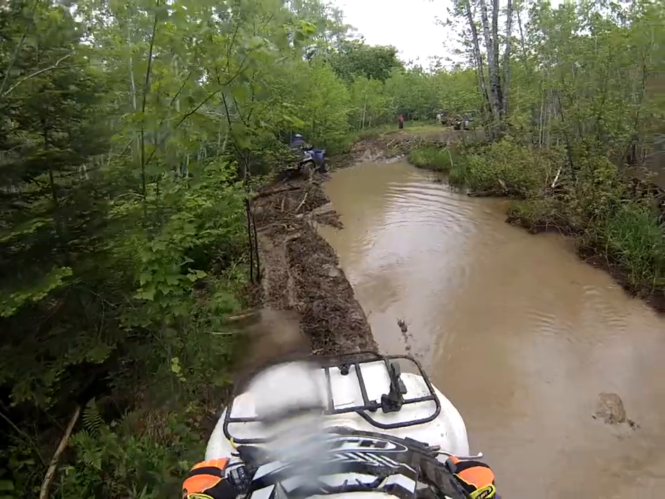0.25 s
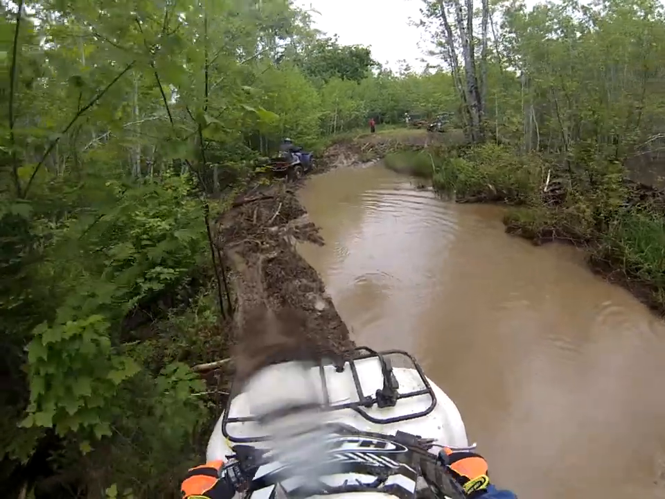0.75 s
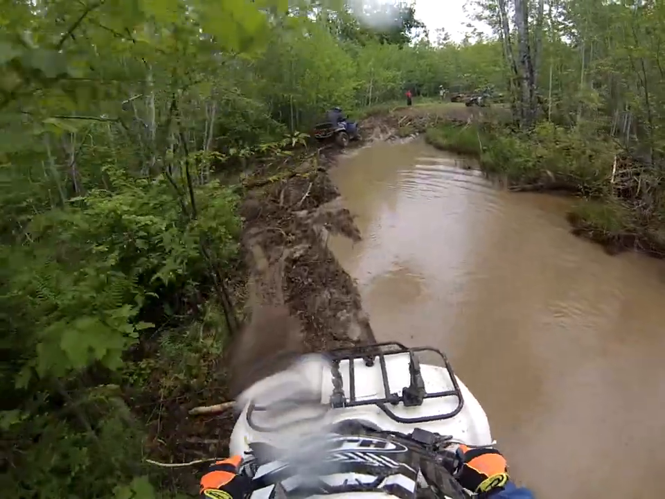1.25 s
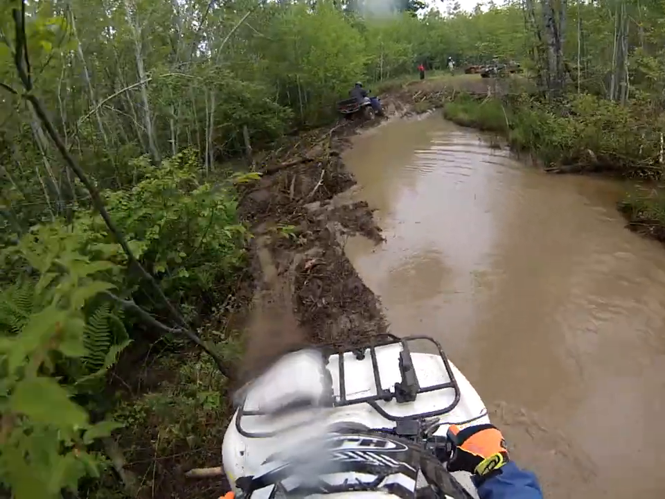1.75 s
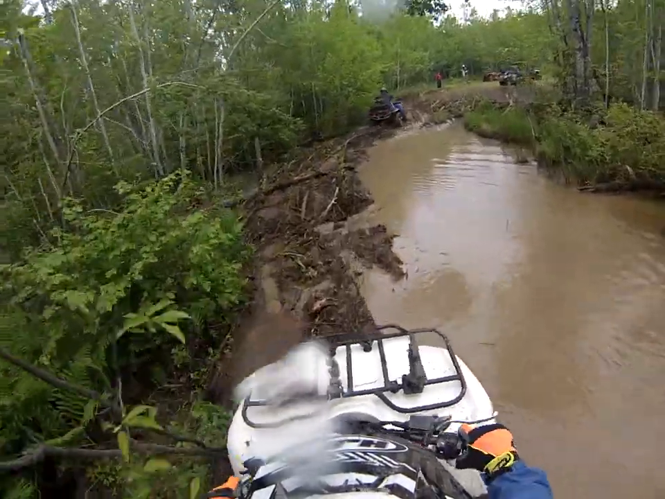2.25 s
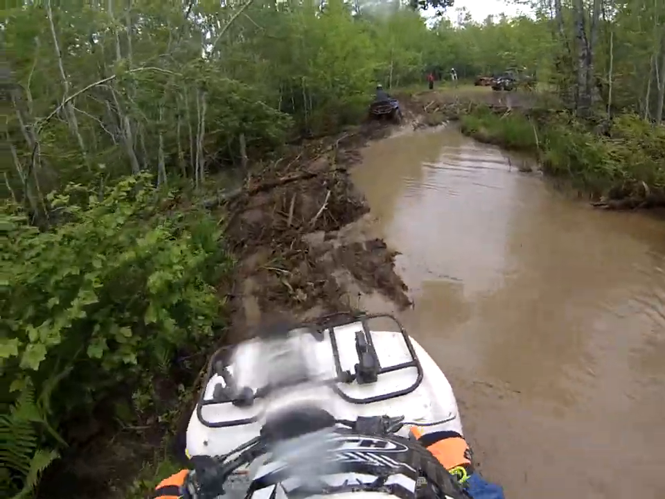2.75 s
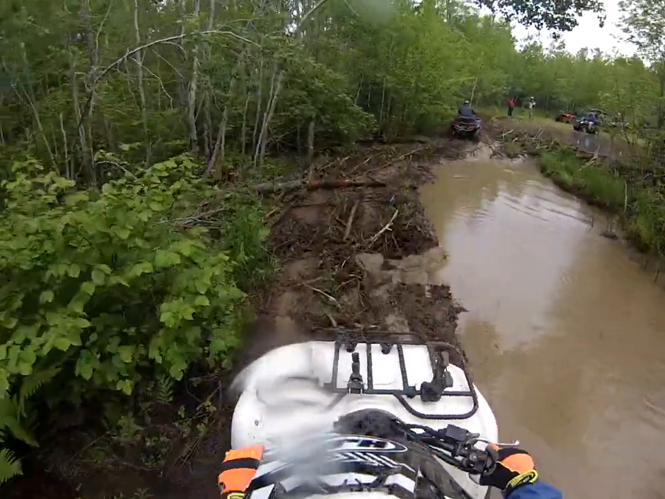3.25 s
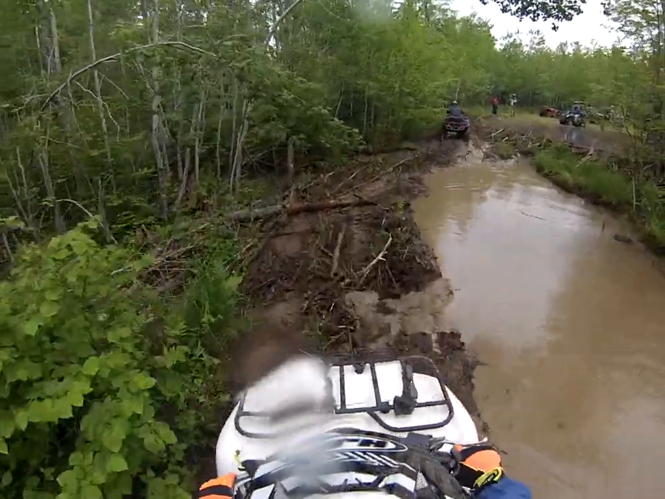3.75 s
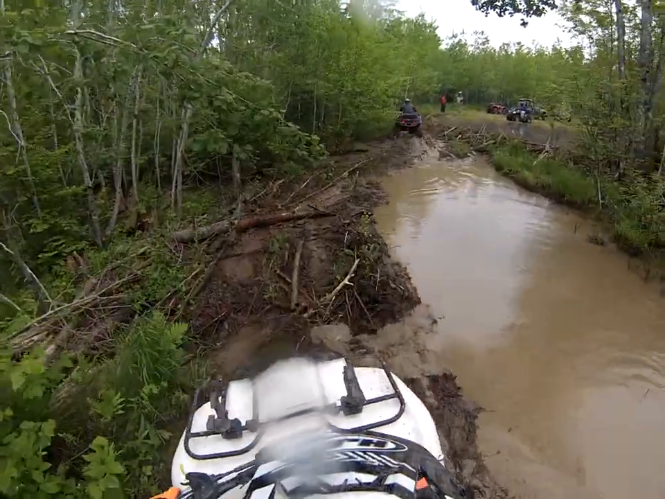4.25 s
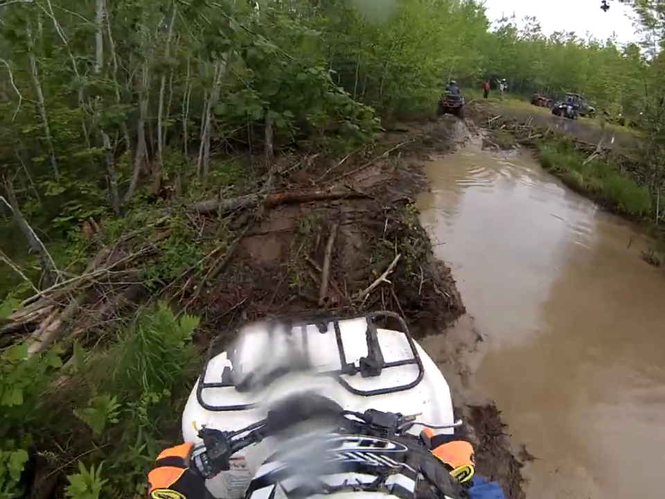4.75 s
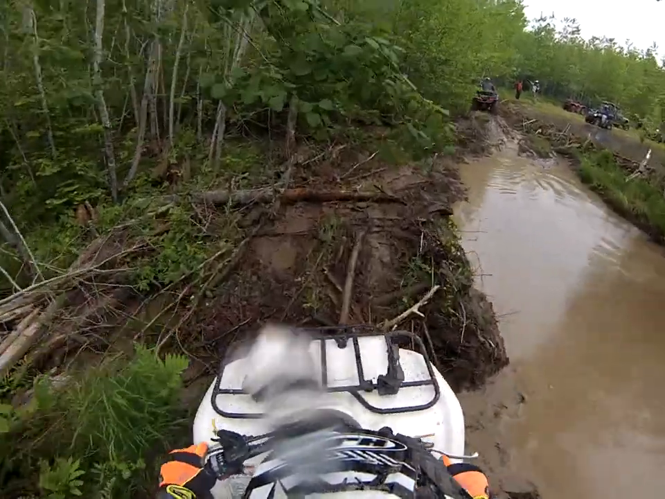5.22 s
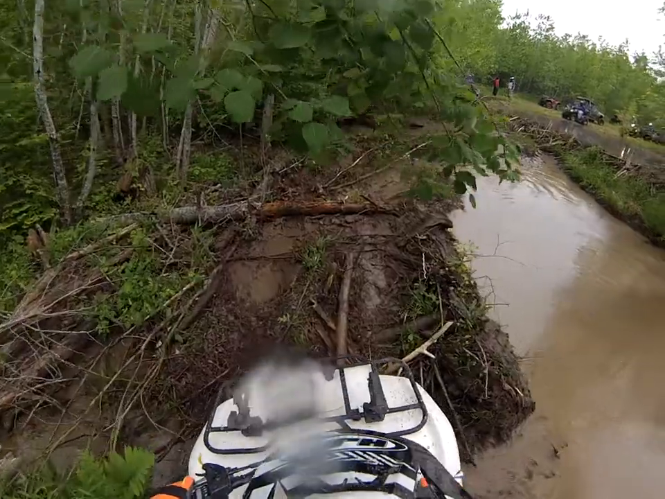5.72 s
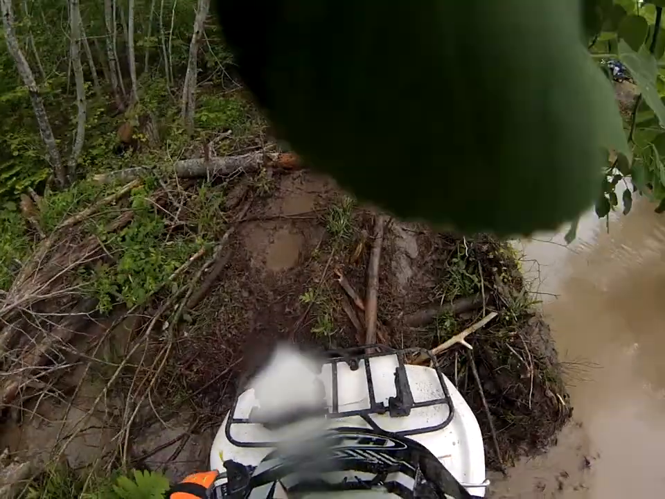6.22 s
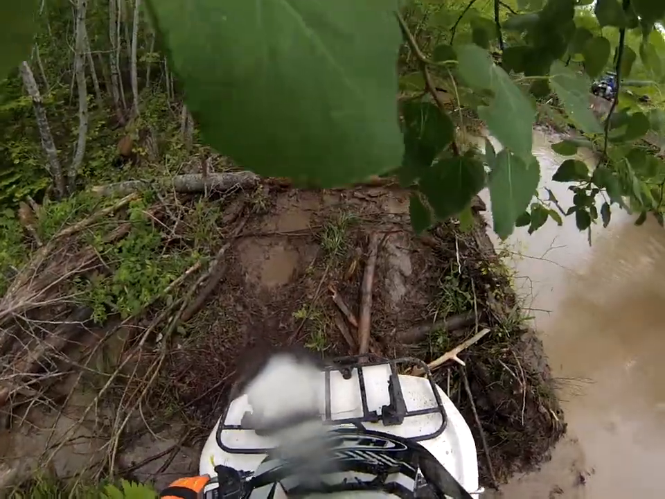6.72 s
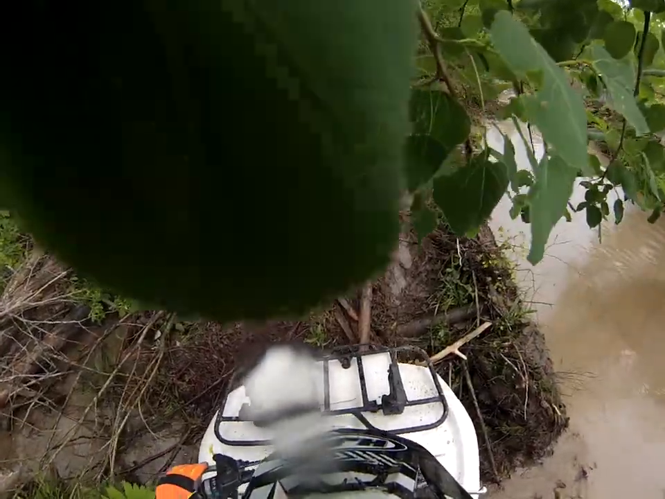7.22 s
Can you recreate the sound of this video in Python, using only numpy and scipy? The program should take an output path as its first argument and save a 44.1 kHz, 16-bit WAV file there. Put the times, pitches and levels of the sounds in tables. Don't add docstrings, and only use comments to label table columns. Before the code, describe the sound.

Heard from inside a closed helmet-camera housing, a one-cylinder quad bike chugs slowly over a muddy woodland trail. Its thump slows early, sags unevenly, then revs up late with buzzing panels. Valves and chain clatter dully while another engine drones further off. Deep jolts shake the microphone; a loud hard knock lands past the middle, then twigs tap and a leaf scrapes briefly.

```python
import sys
import numpy as np
from scipy import signal
from scipy.io import wavfile
from scipy.ndimage import uniform_filter1d

SR = 44100
rng = np.random.default_rng(int(sys.argv[2]) if len(sys.argv) > 2 else 0)


def materialize(psi):
    bounded = np.clip(np.atleast_2d(psi).T, -1, 1)
    quanta = np.round(bounded * 32767).astype(np.int16)
    wavfile.write(sys.argv[1], SR, quanta)


def linear_from_db(decibels):
    return 10 ** (np.asarray(decibels, float) / 20)


N = 329868
T = np.arange(N) / SR

# t/s, firing rate f/Hz
SPEED = [(0, 24.9), (.68, 22.9), (1.25, 16.1), (1.55, 15.3), (1.85, 17.8), (2.75, 16.51), (2.94, 16.85),
         (3.14, 16.13), (3.85, 16.49), (4.6, 12.75), (5.02, 15.24), (5.4, 11.87), (5.69, 17.05),
         (6.18, 15.6), (6.66, 22.95), (7.07, 22.6), (7.3, 27.5), (7.48, 25.6)]
# t/s, exhaust level/dB, frame load [0-1]
EFFORT = [(0, -47, 0.24), (.75, -44.5, 0.48), (1.5, -47, 0.03), (1.85, -44.5, 0.39), (2.9, -43, 0.28),
          (3.6, -46.5, 0.11), (4.4, -47.5, 0.15), (5.05, -46.5, 0.34), (5.3, -46.5, 0.16),
          (5.75, -47, 0.12), (6.18, -49.5, 0), (6.36, -47, 0.65), (6.65, -45.5, 0.89), (7.0, -49.5, 0.96),
          (7.15, -46.5, 1.02), (7.36, -50.5, .95), (7.44, -51, 0.3), (7.48, -62, .2)]
# multiple of firing rate, level/dB
EXHAUST_ORDERS = [(3, -10), (4, 0), (5, -1), (6, -7.5), (7, -13.5), (8, -16), (9, -23), (10, -36)]
# f/Hz, level/dB
PIPE = [(40, -13), (65, -3.5), (90, 0.5), (120, -3.5), (155, -4), (260, 3.5)]
# f/Hz, width/Hz, level/dB
PANELS = [(235, 22, -3), (271.3, 19, 2.5)]
# f/Hz, level/dB per Hz
CLATTER = [(35, 11), (70, 12), (130, 7), (200, 3.5), (300, 0), (500, -1.5), (900, -4), (2000, -8),
           (2900, -10.5), (5000, -15), (8000, -19.5), (12000, -32.5), (15500, -38)]
# f/Hz, width/Hz, level/dB
HOUSING = [(695, 12, 3.5), (1290, 101, 11.5), (1605, 38.6, 9.5), (2336, 280, 11), (4930, 59, -1),
           (7500, 940, 1)]
# t/s, firing rate f/Hz
FAR_SPEED = [(0, 29.8), (1.04, 29.3), (2, 28.8), (2.4, 29.4), (3.04, 26.8), (3.42, 27.8), (3.92, 28),
             (4.42, 29.7), (4.7, 30.2), (5.8, 30), (6.23, 28.8), (7.48, 28)]
# multiple of firing rate, level/dB
FAR_ORDERS = [(2, -17), (3, -5), (4, 1.5), (5, -3), (7, -7.5), (8, -9), (9, -8), (10, 0), (11, -4)]
# f/Hz, level/dB per Hz
HISS = [(1000, -41), (4000, -11), (8000, -16.5), (12000, -6.5), (15500, -12)]
# t/s, level/dB, length/s
JOLTS = [(0.144, -36, 0.029), (0.302, -40, 0.032), (0.78, -39, 0.11), (1.006, -25, 0.036),
         (1.71, -37.5, 0.21), (2.023, -33, 0.053), (2.246, -34, 0.073), (2.618, -35, 0.089),
         (3.03, -45, 0.07), (3.702, -42, 0.058), (3.9, -40.5, 0.095), (4.104, -31, 0.024),
         (4.296, -36.5, 0.096), (4.564, -38, .12), (4.934, -24.5, 0.036), (5.06, -37, 0.046),
         (5.254, -30, 0.055), (5.55, -33, 0.048), (5.752, -19, 0.037), (6.155, -34.5, 0.24),
         (6.38, -29, 0.086), (6.69, -32.5, 0.084), (6.884, -30, 0.032), (7.342, -26.5, 0.058),
         (7.48, -27, 0.037)]
# f/Hz, level/dB per Hz
SHAKE = [(2, -20), (4, -6), (9, -1), (14, 0), (19, -2), (23, -5), (28, -15), (40, -23), (80, -38),
         (200, -60), (600, -95)]
# t/s, ring peak level/dB, thud peak level/dB, struck spot f/Hz, tilt/dB per octave
RAPS = [
    (2.508, -39.5, -50, 2280, -6),
    (2.538, -43, -48, 2330, 6),
    (4.23, -40, -61, 1600, 2.1),
    (4.5375, -3, -15.5, 2040, 0.2),
    (5.2767, -33.5, -23, 1660, -14),
    (5.792, -42, -43, 2000, 8),
    (6.171, -21.5, -31, 2307, 6.5),
    (6.1754, -17, -22.5, 2050, -5.5),
    (6.28, -32.5, -50, 1900, 8),
    (7.229, -38.5, -42, 1630, 11),
]
# f/Hz, level/dB, t60/s
WALL_MODES = [(683, -26, 0.031), (788, -18.5, 0.026), (1000, -13.5, 0.016), (1224, -22.5, 0.028),
              (1615, -2.5, 0.015), (2302, 4, 0.014), (3090, -29, 0.022), (3340, -26, 0.01),
              (3660, -30, 0.03), (3990, -25, 0.02), (4960, -29, 0.0071), (5850, -26.5, 0.007),
              (7210, -32, 0.0067)]
# f/Hz, level/dB, t60/s
HELMET_MODES = [(81, 2.5, 0.056), (128, -2, 0.18), (194, -17, 0.31), (266.6, 3.5, 0.092)]
# f/Hz, level/dB
SCRAPE = [(200, -10), (800, 8), (2500, -1), (6000, 6), (9000, 0), (12000, 6)]

FLYWHEEL_S, START_TURNS = 0.08, 0.427
UNEVEN_DB, LUMPY = -0.75, 0.07
CRANK_DB, CRANK_LOAD_DB = -53, 10.5
BUZZ_DB, BUZZ_LOAD_DB = -76, 32.5
LOOSE_DB, LOOSE_LOAD_DB = -62.5, 6
DRIVE_ORDER, DRIVE_DB = 9, 4.5
CLATTER_DB, CLATTER_LOAD_DB = -54.5, 3
CLATTER_DB_PER_S = -0.2753
FAR_DB, FAR_HIGH_DB, FAR_WAVER_DB = -56, -10, 2.0
FAR_PULL_DB = 1.4
HISS_DB, TREMBLE_DB = -74, -40.5
CHIRP_S, CHIRP_LENGTH_S, CHIRP_DB, CHIRP_HZ = 1.35, 0.44, -77, 8400
TICK_DB, SPOT_DB, SPOT_SLOPE = -24, -10, -0.45
WHINE_START_S, WHINE_DB, WHINE_HZ = 2.9, -78, 5000
LEAF_ON_S, LEAF_OFF_S, LEAF_RISE_S, LEAF_FALL_S, LEAF_DB = 7.1, 7.32, 0.04, 0.026, -55
THIN_HZ, THIN_SHARE, STARVE_DB = 12800, 0.4, -27.5


def evened(x):
    return x / np.sqrt(np.mean(x ** 2) + 1e-20)


def levelled(x, size):
    return x / np.sqrt(uniform_filter1d(x ** 2, size))


def read(points, hz):
    f, value = np.transpose(points)
    return np.interp(np.log(hz + 1), np.log(f + 1), value)


def curves(rows):
    s, *columns = np.transpose(rows)
    return [np.interp(T, s, c) for c in columns]


def colour(x, db_of, size):
    log_gain = np.log(linear_from_db(db_of(abs(np.fft.fftfreq(size, 1 / SR)))))
    taps = np.fft.ifft(np.exp(np.conj(signal.hilbert(log_gain)))).real
    return signal.oaconvolve(x, taps[:size // 2])[:N]


def drift(seconds):
    size = round(seconds * SR)
    return evened(uniform_filter1d(uniform_filter1d(rng.standard_normal(N), size), size))


def resonate(x, hz, width):
    return signal.lfilter(*signal.iirpeak(hz, hz / width, SR), x)


def firing():
    hz = uniform_filter1d(curves(SPEED)[0], round(FLYWHEEL_S * SR))
    turns = START_TURNS + np.cumsum(hz) / SR + 0.004 * drift(0.06)
    cycle = np.floor(turns + 0.5).astype(int)
    strength = linear_from_db(UNEVEN_DB * rng.standard_normal((400, 2)))[cycle]
    return hz, turns, uniform_filter1d(strength, 600, axis=0).T


def exhaust(hz, turns, strength, level_db):
    orders = np.zeros(N)
    for k, db in EXHAUST_ORDERS:
        orders += linear_from_db(db + read(PIPE, k * hz)) * np.sin(2 * np.pi * k * turns)
    return linear_from_db(level_db + 3.0) * (strength + LUMPY * drift(0.0092)) * levelled(orders, 12000)


def crank(turns, load):
    shake = np.sin(4 * np.pi * turns) + 0.81 * np.sin(2 * np.pi * turns)
    return -np.sqrt(2) * linear_from_db(CRANK_DB + CRANK_LOAD_DB * load) * shake


def panel_gain(hz):
    power = sum(linear_from_db(2 * db) / (1 + (2 * (hz - f) / width) ** 2) ** 1.38 for f, width, db in PANELS)
    return np.sqrt(power)


def panel_buzz(hz, turns, strength, load):
    picked = np.zeros(N)
    for k in range(7, 24):
        gain = linear_from_db(DRIVE_DB * (k == DRIVE_ORDER)) * panel_gain(k * hz) ** 1.15
        picked += gain * np.cos(2 * np.pi * (k * turns - 0.08 * k ** 2))
    return linear_from_db(BUZZ_DB + BUZZ_LOAD_DB * load) * strength * levelled(picked, 12000)


def loose_parts(load):
    rattle = colour(rng.standard_normal(N), lambda f: 20 * np.log10(panel_gain(f)), size=16384)
    return linear_from_db(LOOSE_DB + LOOSE_LOAD_DB * load) * evened(rattle)


def housing_db(hz):
    peaks = sum(db / (1 + ((hz - f) / width) ** 2) for f, width, db in HOUSING)
    return read(CLATTER, hz) + peaks


def clatter(turns, strength, load):
    beat = 0.048 * strength * np.cos(2 * np.pi * (turns + 0.21))
    swell = 1 + 0.033 * drift(0.011) + beat + 0.1 * drift(0.01)
    noise = colour(swell * rng.standard_normal(N), housing_db, size=16384)
    noise /= np.sqrt(np.mean(resonate(noise, 1380, 2500) ** 2))
    return linear_from_db(CLATTER_DB + CLATTER_LOAD_DB * load + CLATTER_DB_PER_S * T) * noise


def far_engine():
    hz, = curves(FAR_SPEED)
    turns = np.cumsum(hz) / SR + 0.005 * drift(0.05)
    pull_db = FAR_HIGH_DB + FAR_PULL_DB * uniform_filter1d(np.gradient(hz) * SR, SR // 2)
    out = np.zeros(N)
    for k, db in FAR_ORDERS:
        level_db = db + FAR_DB + pull_db * (k >= 6) + FAR_WAVER_DB * drift(0.18)
        out += linear_from_db(level_db) * np.sin(2 * np.pi * (k * turns + rng.random()))
    return np.sqrt(2) * out


def hiss():
    return linear_from_db(HISS_DB) * evened(colour(rng.standard_normal(N), lambda f: read(HISS, f), size=1024))


def jolts():
    level = linear_from_db(TREMBLE_DB) + sum(linear_from_db(db) * np.exp(-((T - s) / length) ** 2) for s, db, length in JOLTS)
    lumps = colour(rng.standard_normal(N), lambda f: read(SHAKE, f), size=65536)
    size = np.sqrt(uniform_filter1d(lumps ** 2, 9000))
    lumps = evened(lumps / size ** 0.89)
    return signal.lfilter(*signal.butter(3, 34, fs=SR), level * lumps)


def belt_chirps(turns):
    squeal = resonate(resonate(rng.standard_normal(N), CHIRP_HZ, 900), CHIRP_HZ, 900)
    chirps = evened(squeal * np.exp(-(2 * turns % 1) / 0.2))
    return linear_from_db(CHIRP_DB) * np.exp(-((T - CHIRP_S) / CHIRP_LENGTH_S) ** 2) * chirps


def rung(modes, t, rise_s, lag_s, sense):
    ringing = np.zeros(len(t))
    for k, (hz, db, t60) in enumerate(modes):
        ringing += sense ** k * linear_from_db(db - 60 * t / t60) * np.cos(2 * np.pi * hz * (t - lag_s))
    ringing *= 1 - np.exp(-(t / rise_s) ** 1.22)
    return ringing / abs(ringing).max()


def raps():
    out, t = np.zeros(N + SR), np.arange(SR // 4) / SR
    for s, ring_db, thud_db, spot_hz, tilt_db in RAPS:
        grit = np.diff(rng.standard_normal(len(t) + 1)) * t / 0.0013 * np.exp(-t / 0.0012)
        tick = resonate(resonate(grit, 4200, 4000), 5500, 4500)
        modes = [(f, db + tilt_db * np.log2(f / 2000), t60) for f, db, t60 in WALL_MODES]
        modes = sorted(modes + [(spot_hz, SPOT_DB + SPOT_SLOPE * ring_db, 0.016)])
        contact_s = 0.00084 + 0.00049 * linear_from_db(ring_db)
        ring = rung(modes, t, contact_s, 0.0001, sense=-1) + linear_from_db(TICK_DB + 2.4 * tilt_db) * tick
        thud = rung(HELMET_MODES, t, 0.0013, 0.0046, sense=1)
        out[round(s * SR):][:len(t)] += linear_from_db(ring_db) * ring + linear_from_db(thud_db) * thud
    return out[:N]


def fan_whine():
    return linear_from_db(WHINE_DB) * (T > WHINE_START_S) * evened(resonate(rng.standard_normal(N), WHINE_HZ, 90))


def leaf(turns):
    edge = np.minimum((T - LEAF_ON_S) / LEAF_RISE_S, (LEAF_OFF_S - T) / LEAF_FALL_S)
    pressed = np.exp(np.minimum(0, edge))
    slips = 0.22 + np.exp(-((turns + 0.23) % 1) / 0.27)
    scrape = colour(slips * rng.standard_normal(N), lambda f: housing_db(f) + read(SCRAPE, f), size=4096)
    return linear_from_db(LEAF_DB) * pressed * evened(scrape)


def thinned(x):
    hz, t, z = signal.stft(x, SR, nperseg=1024, noverlap=768)
    hz = hz[:, None]
    bass_db = 10 * np.log10(2 * uniform_filter1d((abs(z[:2]) ** 2).sum(0), size=5) + 1e-12)
    luck = uniform_filter1d(rng.standard_normal((len(t), len(hz))), size=16, axis=0)
    luck = evened(uniform_filter1d(luck, size=3, axis=1)).T
    rap = abs(z[40:60]).mean(0) > 0.002
    bar = np.quantile(luck, THIN_SHARE) + 1.6 * (bass_db > STARVE_DB) - 9 * rap + (hz - 14000) / 2500
    gain = np.where(hz > THIN_HZ, np.where(luck < bar, 0.06, 1.25), 1)
    return signal.istft(z * gain, SR, nperseg=1024, noverlap=768)[1][:N]


def scene():
    hz, turns, (pipe_strength, frame_strength) = firing()
    exhaust_db, load = curves(EFFORT)
    out = exhaust(hz, turns, pipe_strength, exhaust_db) + crank(turns, load)
    out += panel_buzz(hz, turns, frame_strength, load) + loose_parts(load)
    out += clatter(turns, frame_strength, load)
    out += far_engine() + jolts() + belt_chirps(turns) + raps() + fan_whine() + leaf(turns)
    return out[None]


def roll_off(x):
    return signal.sosfilt(signal.butter(12, 15180, fs=SR, output="sos"), x)


def record(dry):
    band_limit = signal.firwin(301, 15500, window=("kaiser", 8), fs=SR)
    mix = thinned(signal.oaconvolve(dry[0] + hiss(), band_limit, "same"))[None]
    return roll_off(mix)


dry = scene()
out = record(dry)
materialize(out)
```